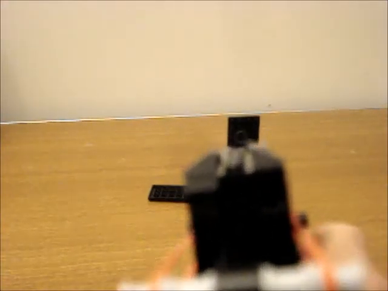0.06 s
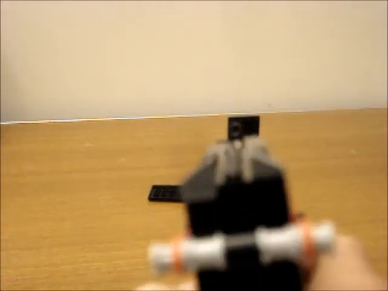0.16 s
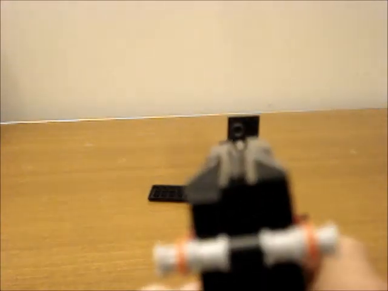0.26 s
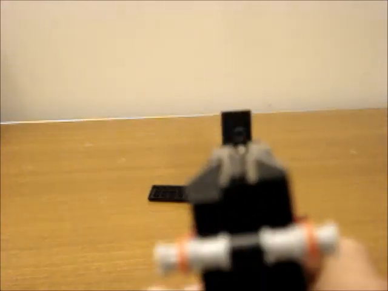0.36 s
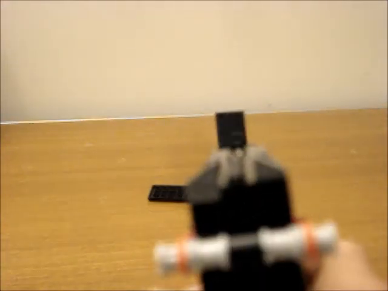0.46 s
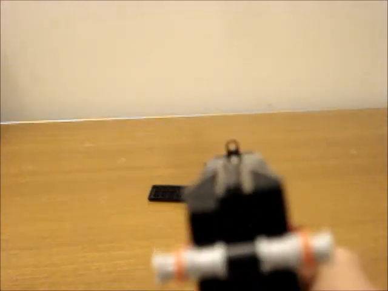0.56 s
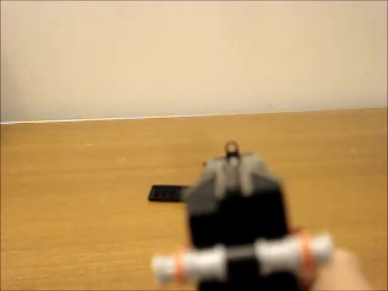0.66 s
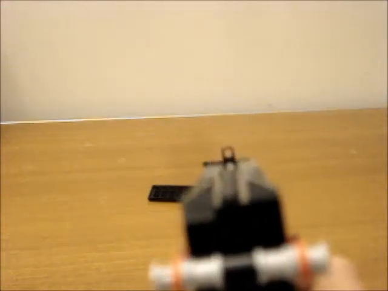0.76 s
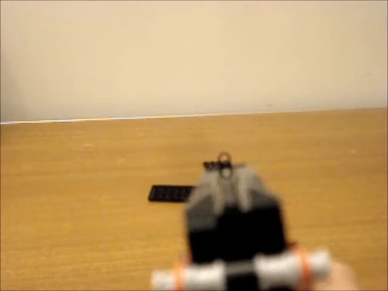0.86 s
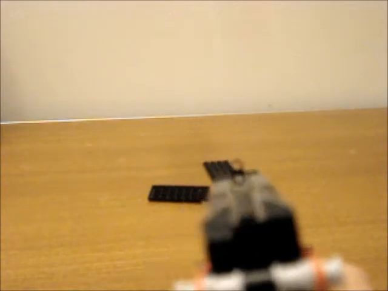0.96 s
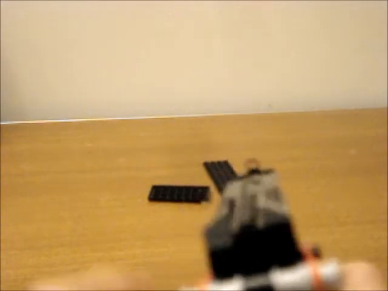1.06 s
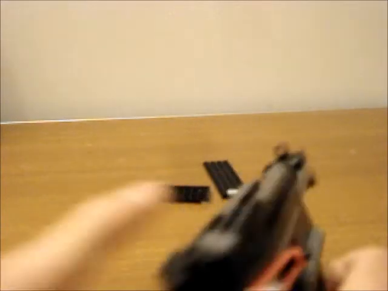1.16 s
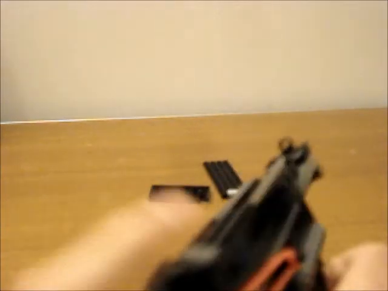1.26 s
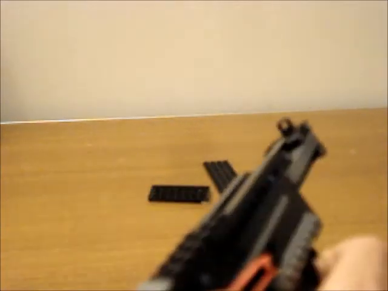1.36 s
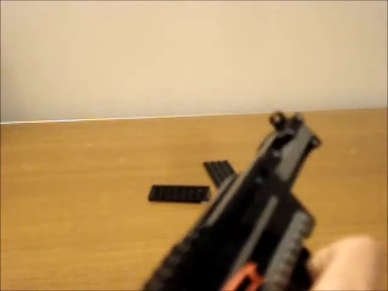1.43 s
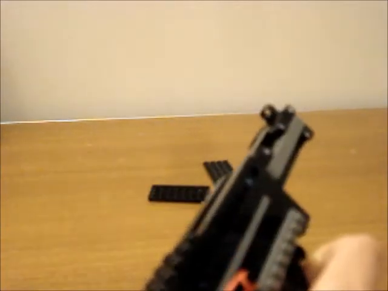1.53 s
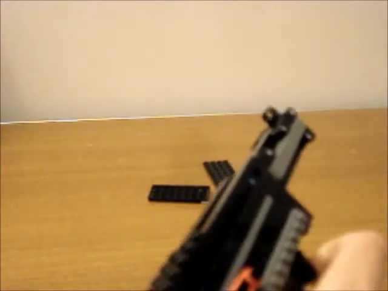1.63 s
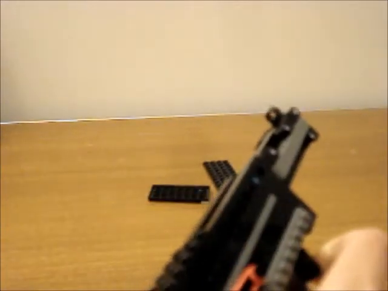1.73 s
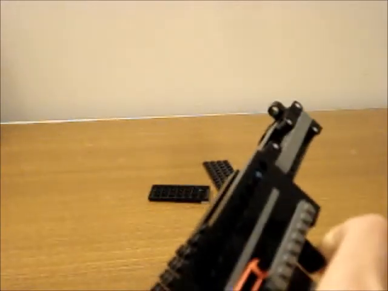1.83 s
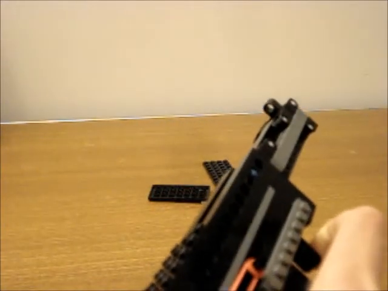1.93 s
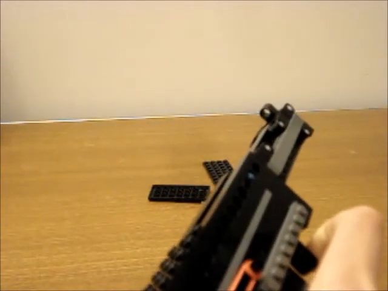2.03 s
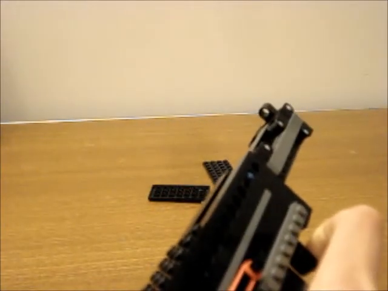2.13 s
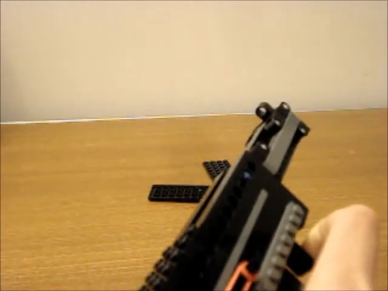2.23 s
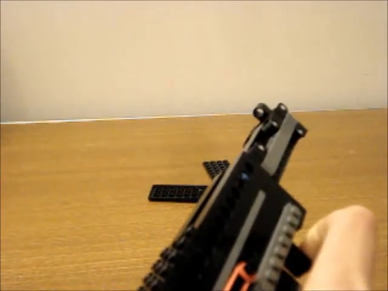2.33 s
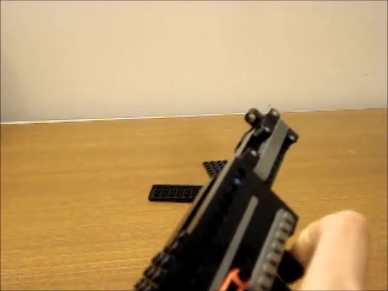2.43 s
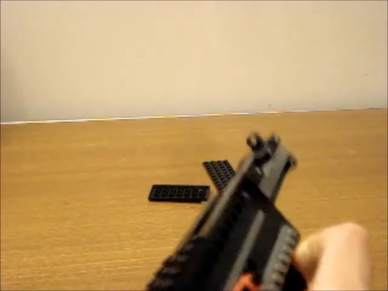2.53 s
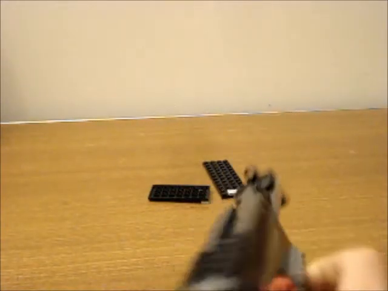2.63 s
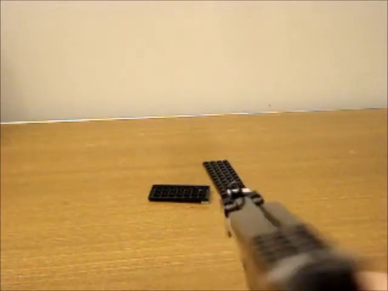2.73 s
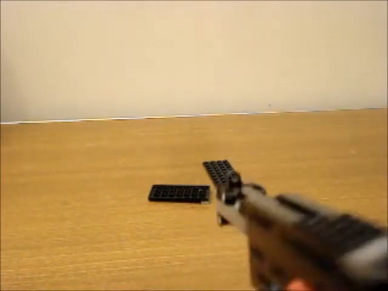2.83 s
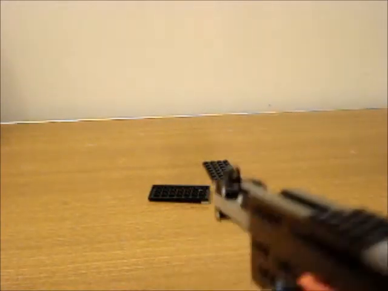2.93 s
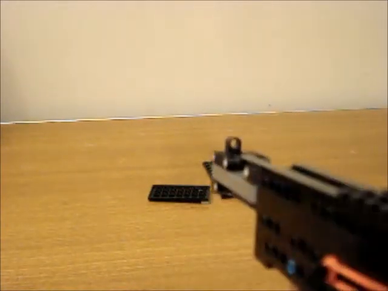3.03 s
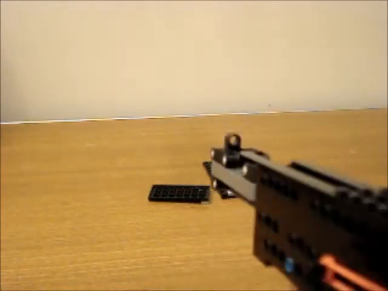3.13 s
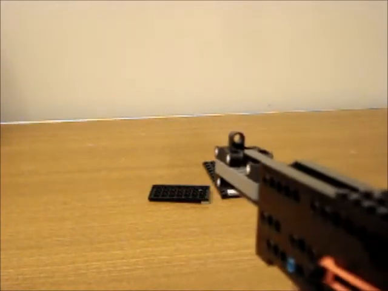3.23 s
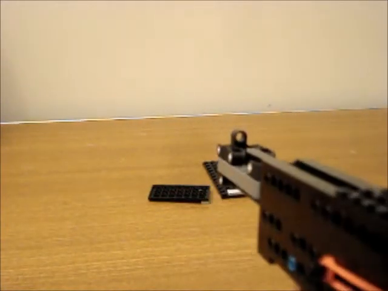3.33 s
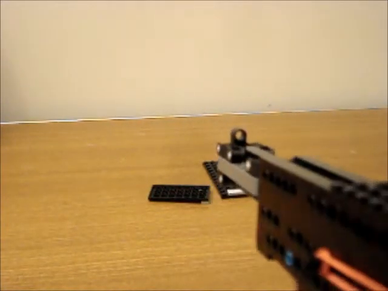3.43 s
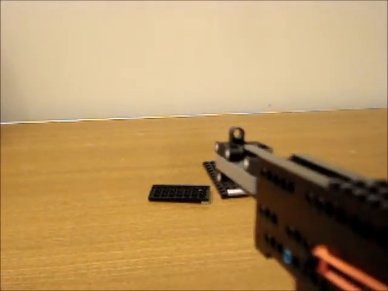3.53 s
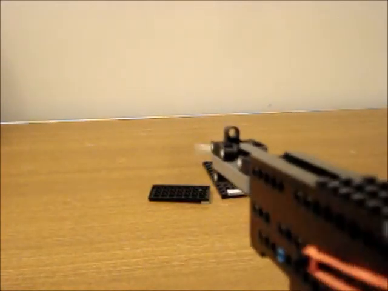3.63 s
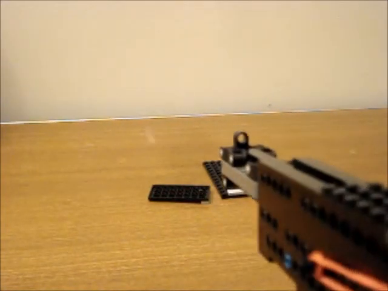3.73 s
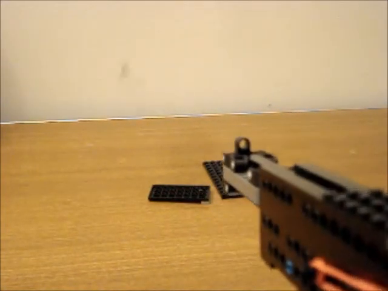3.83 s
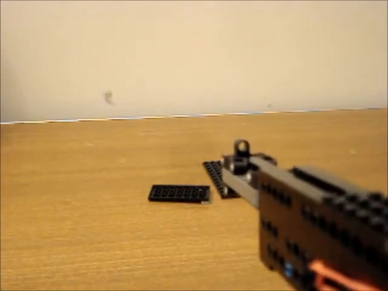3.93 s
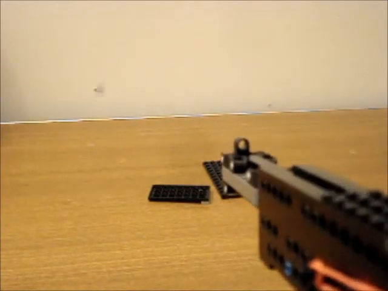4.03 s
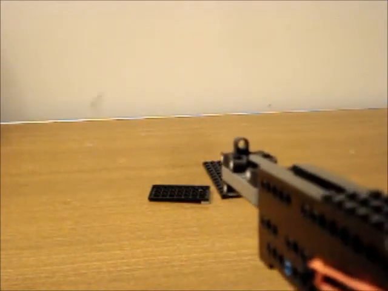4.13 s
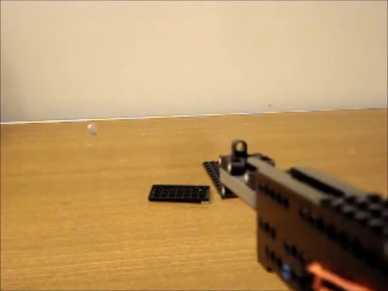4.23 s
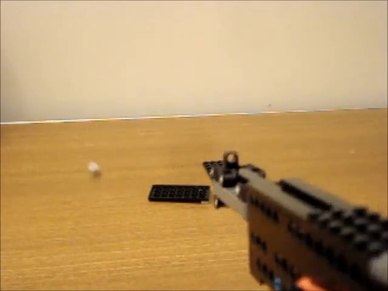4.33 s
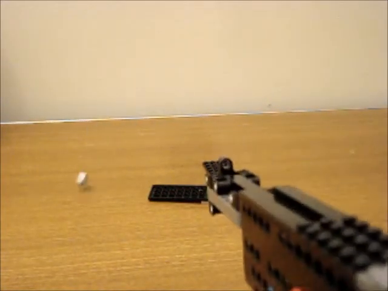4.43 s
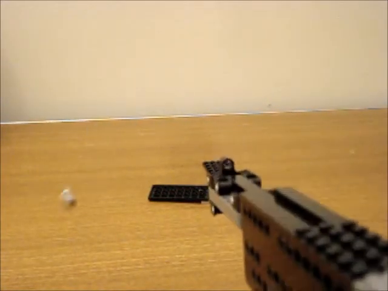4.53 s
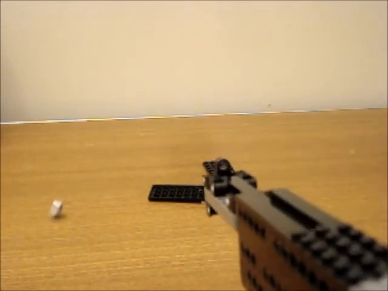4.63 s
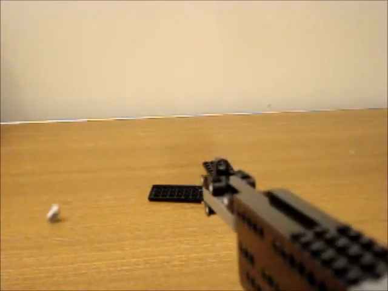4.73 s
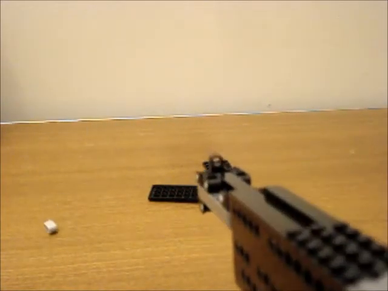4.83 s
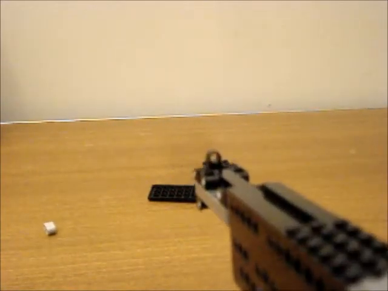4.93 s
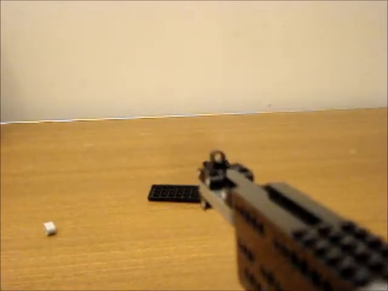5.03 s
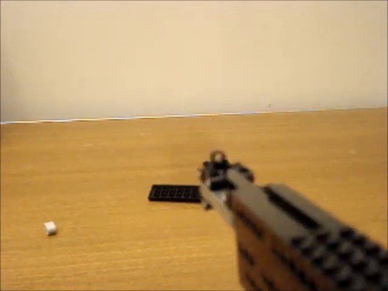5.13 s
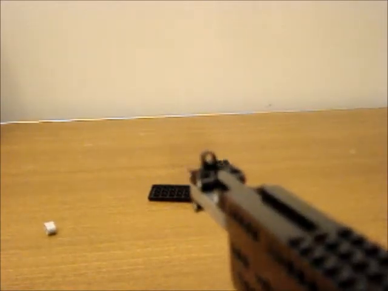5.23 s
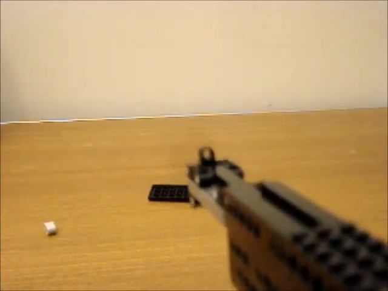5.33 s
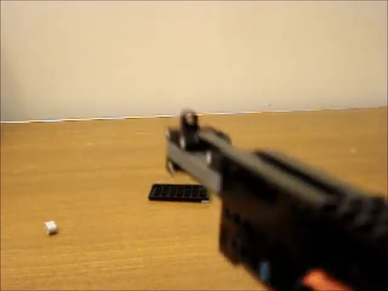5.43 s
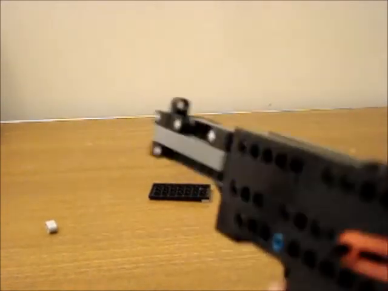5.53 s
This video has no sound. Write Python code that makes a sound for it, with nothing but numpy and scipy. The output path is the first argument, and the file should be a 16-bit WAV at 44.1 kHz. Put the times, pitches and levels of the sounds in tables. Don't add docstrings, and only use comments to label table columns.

```python
import sys
import numpy as np
from scipy import signal
from scipy.io import wavfile
from scipy.ndimage import uniform_filter1d

SR = 44100
rng = np.random.default_rng(int(sys.argv[2]) if len(sys.argv) > 2 else 0)


def gain_from_db(level_db):
    decades = np.asarray(level_db, float) / 20
    return 10 ** decades


def transcribe(u):
    v = np.clip(np.atleast_2d(u).T, -1, 1)
    q = np.round(v * 32767).astype(np.int16)
    wavfile.write(sys.argv[1], SR, q)


N = 246456

# f/Hz, level/dB
FAN_COLOUR = [(15, -41), (25, -5.5), (59, -26), (120, -11.5), (204, -12.5), (237, -6), (269, -12),
              (619, -6.5), (905, -8), (1110, -7.5), (1790, -9.5), (1980, -12), (2970, -18.5), (9020, -32.5),
              (10500, -34), (13600, -88), (22000, -120)]
# f/Hz, level/dB against the fan noise, width/Hz
FAN_TONES = [(328, -34, 11), (628, -15, 18), (685, -14, 6.7), (1950, -11.5, 67), (2570, -13.5, 190),
             (3970, -22.5, 170)]
# f/Hz, level/dB against the fan noise
MAINS_HUM = [(120, -26), (240.5, -11.5)]
# f/Hz, time to fall 60 dB/s
ROOM_DECAY = [(300, 0.29), (1000, 0.36), (2500, 0.27), (5000, 0.41), (10000, 0.2)]
# f/Hz, level/dB, time to fall 60 dB/s
THUD_TONES = [(243, -2, 0.13), (329, -1, 0.089), (390, -7, 0.085), (606, -7, 0.097)]

# f/Hz, level/dB per Hz
PISTOL_COLOUR = [(350, -53.5), (600, -30), (781, -24), (946, -13.5), (1130, -13), (1890, -4.5),
                 (2320, -7.5), (2590, -1.5), (4180, -6.5), (5430, -2.5), (9310, -15), (10100, -24),
                 (10500, -45), (13600, -77.5), (22000, -120)]
TABLE_COLOUR = [(120, -40), (200, -20), (466, -11), (597, -13.5), (846, -6), (1240, -3.5), (1440, -7.5),
                (2740, -3.5), (3460, -6.5), (9510, -11.5), (10500, -18.5), (13600, -61), (22000, -120)]
PLATE_COLOUR = [(120, -75.5), (200, -12), (450, -12.5), (700, -17.5), (1100, -13.5), (1500, 0.5),
                (1900, -9), (2500, -3.5), (3500, -13), (5400, -11.5), (7800, -16.5), (10500, -20),
                (13600, -66), (22000, -120)]
HOLLOW_COLOUR = [(300, -50), (700, -17), (1250, -7.5), (1700, -12), (2700, -3), (4300, -9), (7000, -18),
                 (22000, -110)]

# t/s, swell or first sinking/s, level at its end/dB, fade from there/(dB per s) Loose bricks in
RATTLES = [
    (0.153, 0.04, -23.5, 240),
    (2.09, 0.018, -25.5, 246),
    (2.477, 0.0075, -32.5, 246.5),
    (3.612, 0.037, -23.5, 298),
]
WOBBLES = [(0.303, 0.0046, -26.5, 179), (0.357, 0.00067, -20, 490), (0.494, .002, -35, 400),
           (0.79, 0.0052, -27.5, 458), (0.861, 0.0053, -42, 240), (0.934, .13, -31.5, 340),
           (3.773, 0.027, -25, 275), (3.968, .002, -36.5, 308), (4.37, .002, -32, 230),
           (4.472, 0.009, -31, 243), (4.558, 0.0096, -35.5, 50.6)]
SHUDDER = [
    (0.612, 0.0093, -21, 770),
    (0.655, 0.068, -41.5, 300),
]

# t/s, peak level/dB, ring f/Hz, tilt/(dB per octave)
HANDLING = [
    (1.3413, -31, 2040, -3.5),
    (1.5779, -25, 2140, -6),
    (1.621, -31.5, 3400, -4),
    (1.6827, -31, 1890, -4),
    (2.2505, -33.5, 3500, -2),
    (2.3366, -32, 1980, -8),
    (2.361, -33, 1860, -8),
    (5.2907, -39, 1900, -15),
    (5.3185, -34.5, 2870, -7),
]
TRIGGER_TICKS = [
    (2.6849, -38, 3740, 12),
    (3.1152, -34.5, 3050, 6.3),
    (5.3589, -34.5, 2620, 9.5),
]
PLATE_SLAPS = [
    (0.6092, -15, 1300, -3.5),
    (0.6166, -21, 2520, -9),
    (0.6245, -22.5, 1510, -8.5),
    (0.6367, -16.5, 1400, 2.8),
    (0.6465, -19, 1660, -11.3),
]
FIRST_BOUNCES = [(0.3022, -11.0, 5770, 2.5), (0.3099, -12.5, 2500, -0.4), (0.3256, -14, 4100, -0.5),
                 (0.3561, -20.5, 2180, -9.5), (0.4924, -17, 4620, -3), (0.5008, -22, 2820, 3),
                 (0.5109, -23, 1100, -4), (0.5824, -18.5, 3550, 1.5), (0.5907, -21.5, 1060, -8),
                 (0.7885, -18, 2920, 1), (0.7935, -19, 2800, -2.5), (0.8604, -24, 2120, -3),
                 (0.8717, -18.5, 4180, -2), (0.8799, -34.5, 2750, 12), (0.8963, -25, 4160, 5),
                 (0.9321, -24.5, 4200, 0.5), (0.9388, -25.5, 1320, -6), (0.981, -27, 4530, 3),
                 (1.0139, -29.5, 1610, 8), (1.0219, -29.5, 4180, 2)]
SECOND_BOUNCES = [(3.7723, -19.5, 1330, 4), (3.787, -27, 5200, -6), (3.7957, -27, 1330, 12),
                  (3.9669, -15.5, 1810, 1.5), (3.9835, -23.5, 4030, -1), (3.9915, -21.5, 5800, 2.5),
                  (4.2012, -17.5, 3190, 1), (4.2044, -15.5, 1260, 1.5), (4.2115, -24.5, 3150, -5),
                  (4.2295, -29, 1190, -3), (4.3665, -19.5, 1200, -2), (4.3724, -20, 1960, -1),
                  (4.4023, -22.5, 3120, 1), (4.4091, -35, 3120, -3), (4.4737, -22, 3320, 1.5),
                  (4.487, -25, 1340, -3), (4.4944, -25, 2850, -2), (4.5045, -29, 6370, 2),
                  (4.5573, -21, 2500, 3), (4.6051, -23.5, 1790, 0), (4.6394, -20, 1070, 2),
                  (4.6865, -28, 3500, -3.5), (4.7044, -28, 1250, 1), (4.7383, -31, 1090, -5),
                  (4.7791, -27.5, 3470, 3), (4.7865, -28.5, 3040, -2), (4.8289, -28.5, 3090, 0.5),
                  (4.8781, -31.5, 1490, -2.1)]
PLATE_KNOCKS = [
    (3.8925, -15.5, 2800, .2),
    (3.8973, -20, 2890, -1.1),
    (3.9037, -17.5, 2240, -1.3),
    (3.9085, -20, 2730, -1.6),
    (3.9209, -28, 2880, .2),
    (3.9251, -50, 2220, .2),
]
COCKING = [
    (2.0857, -19.5, 4200, 3),
    (2.0949, -16, 3890, 17),
    (2.0986, -20, 3350, -12),
    (2.1213, -14.5, 5850, 9),
    (2.1247, -19.5, 6500, -1.5),
]
LATCH = [
    (2.4765, -14.5, 2300, -0.6),
    (2.4787, -14.5, 2970, -1.5),
    (2.4859, -23, 3440, 1.5),
    (2.5027, -20, 2540, 1.5),
]
SHOTS = [(0.1525, -10, 3660, 3), (0.1616, -28, 5980, -10), (0.1762, -12, 5210, 10),
         (0.1811, -13.5, 1850, 17), (0.1967, -17, 4120, 14), (3.611, -9, 5610, 2.5),
         (3.6213, -12.5, 5260, 9), (3.6334, -14.5, 5500, 2), (3.6407, -10, 5800, 9.5),
         (3.6571, -38, 4670, 6), (3.6666, -15.5, 5320, 8)]

# t/s, jump (1 = full scale), settling time/s
ZERO_KICKS = [(.153, .04, .043), (.1648, -.62, .0001), (.1648, -.035, .005), (.184, -.012, .004),
              (.302, -.013, .006), (.6092, -.95, .00012), (2.096, .015, .025), (2.112, -.005, .01),
              (3.611, .025, .05), (3.6225, -.3, .0001), (3.6225, -.03, .005), (3.641, -.015, .005),
              (3.657, -.005, .004), (3.773, -.015, .005)]
# t/s (4 ms after the gap closes), lowest emptied f/Hz,
# length/s
EMPTIED = [(0.302, 2500, .008), (0.492, 3000, .016), (0.608, 4000, .015), (0.788, 2800, .026),
           (0.931, 7600, .026), (1.338, 5300, .03), (1.578, 2300, .02), (1.683, 5100, .018),
           (2.085, 3000, .023), (2.475, 1800, .02), (2.685, 6400, .012), (2.709, 6200, .016),
           (3.116, 6900, .01), (3.141, 6200, .017), (3.772, 6500, .016), (3.892, 4000, .03),
           (4.201, 2500, .016), (4.557, 5500, .012), (4.639, 8300, .02), (4.779, 7100, .017),
           (5.318, 6700, .016), (5.359, 5500, .03)]


def evened(x):
    return x / np.sqrt(np.mean(x ** 2) + 1e-20)


def read(points, hz):
    f, value = np.transpose(points)
    return np.interp(np.log(hz + 1), np.log(f + 1), value)


def add(mix, s, sound):
    part = mix[round(s * SR):][:len(sound)]
    part += sound[:len(part)]


def causal(gain_db, size=512):
    hz = abs(np.fft.fftfreq(2 * size, 1 / SR))
    log_gain = np.log(gain_from_db(np.maximum(gain_db(hz), -100)))
    spectrum = np.exp(np.conj(signal.hilbert(log_gain)))
    return np.fft.ifft(spectrum).real[:size]


def background(fan_db=-41.5, patchy_db=1.0):
    frames, hz = N // 256 + 5, np.fft.rfftfreq(1024, 1 / SR)
    a, b, patches = rng.standard_normal((frames, 513, 3)).T
    patches = uniform_filter1d(patches, size=10, axis=0)
    patches = evened(uniform_filter1d(patches, size=10, axis=1))
    z = (a + 1j * b) * gain_from_db(read(FAN_COLOUR, hz)[:, None] + patchy_db * patches)
    out = evened(signal.istft(z, nperseg=1024, noverlap=768)[1][:N])
    t = np.arange(N) / SR
    for tone_hz, db, width in FAN_TONES:
        r = np.exp(-np.pi * width / SR)
        noise = rng.standard_normal(N) + 1j * rng.standard_normal(N)
        wander = signal.lfilter([1], [1, -r], noise)
        out = out + gain_from_db(db) * evened((wander * np.exp(2j * np.pi * tone_hz * t)).real)
    for hum_hz, db in MAINS_HUM:
        out = out + gain_from_db(db + 3.5) * np.sin(2 * np.pi * hum_hz * t)
    return out * gain_from_db(fan_db)


def thud():
    out, t = np.zeros(N), np.arange(6000) / SR
    knock = np.zeros(len(t))
    for hz, db, t60 in THUD_TONES:
        knock += gain_from_db(db - 60 * t / t60) * np.sin(2 * np.pi * hz * t)
    soft_start = np.minimum(t / 0.003, 1)
    add(out, 3.007, gain_from_db(-32.5) * knock * soft_start)
    return out


def room(x, gap=0.002, count=3):
    out, at = np.zeros(N), np.arange(round(gap * SR), SR // 2 - 12, 12)
    for k in range(count):
        taps = np.zeros(SR // 2)
        sign = rng.choice([-1.0, 1.0], 2000)[:len(at)]
        late = rng.integers(0, 12, 2000)[:len(at)]
        taps[at + late] = sign
        hz, t, z = signal.stft(taps, SR, nperseg=128)
        fade = gain_from_db(-60 * t / read(ROOM_DECAY, hz)[:, None])
        tail = signal.istft(z * fade, SR, nperseg=128)[1]
        turn = np.sqrt(2 / count) * np.cos(2 * np.pi * (3.3 * np.arange(N) / SR + k / (2 * count)))
        out += signal.fftconvolve(x * turn, tail / np.linalg.norm(tail))[:N]
    return out


def rattle(rows, colour, per_s, spread_db, trim_db, swell_db):
    t, level = np.arange(N) / SR, np.zeros(N)
    for s, swell, db, fade_db in rows:
        late = t - s - swell
        rise = swell_db * np.maximum(late / swell, -1)
        level += (t >= s) * gain_from_db(db + np.where(late < 0, rise, -fade_db * late))
    size = rng.standard_normal(N) * gain_from_db(spread_db * rng.exponential(1, N).clip(0, 4))
    hits = (rng.random(N) < per_s / SR) * size
    ticks = signal.oaconvolve(hits, causal(lambda hz: read(colour, hz)))
    return gain_from_db(trim_db) * level * evened(ticks[:N])


def clicks(rows, colour, contact, ring_db, t60, bump_db, bass_db, room_db):
    direct, feed, t = np.zeros(N), np.zeros(N), np.arange(2048) / SR
    for s, db, ring_hz, tilt_db in rows:
        def shape(hz):
            tilt = tilt_db * np.log2(np.clip(hz, 1000, 11000) / 3000)
            bump = bump_db * np.exp(-(np.log((hz + 1) / ring_hz) / 0.19) ** 2)
            bass = bass_db / (1 + (hz / 1300) ** 4)
            return read(colour, hz) + tilt + bump + bass

        impulse = causal(shape)
        tick = 1.67 * np.exp(-t / 0.000044)
        snap = np.exp(-t / contact)
        chatter = 0.37 * np.exp(-t / 0.0039)
        grit = rng.standard_normal(len(t)) * (tick + snap + chatter)
        crack = np.convolve(grit, impulse)[:len(t)]
        crack = crack / abs(crack).max()
        ring = np.sin(2 * np.pi * ring_hz * t) * gain_from_db(ring_db - 60 * t / t60)
        add(direct, s, gain_from_db(db) * (crack + ring))
        energy = np.linalg.norm(crack) / np.linalg.norm(impulse)
        add(feed, s, gain_from_db(db + room_db) * impulse * energy)
    return np.array([direct, feed])


def slow_gain(x, knee_db=-32.5, share=1.26, memory=0.47, steep=1.577):
    r = np.exp(-1 / (memory * SR))
    load = (abs(uniform_filter1d(x ** 2, size=900)) / gain_from_db(2 * knee_db)) ** steep
    return (1 + signal.lfilter([1 - r], [1, -r], load)) ** (-share / 2)


def ducking(x, knee_db=-24.0, share=0.24, recover_db=84.5):
    power_db = 10 * np.log10(abs(uniform_filter1d(x ** 2, size=100)) + 1e-12)
    fall = np.arange(N) * recover_db / SR
    held_db = np.maximum.accumulate(power_db + fall) - fall
    return gain_from_db(-share * np.maximum(held_db - knee_db, 0))


def zero_line():
    out, t = np.zeros(N), np.arange(12000) / SR
    for s, jump, settle in ZERO_KICKS:
        add(out, s, jump * np.exp(-t / settle))
    return out


def lead_in(x, db=-12.5, spread=0.0015):
    t = np.arange(400) / SR
    smear = rng.standard_normal(len(t)) * np.exp(-t / spread)
    smear = smear[None] / np.linalg.norm(smear)
    backwards = signal.oaconvolve(x[:, ::-1], smear)[:, :N]
    return x + gain_from_db(db) * backwards[:, ::-1]


def dropouts(x, busy_db=-66.0, chance=0.26, calm=0.24, spared=0.1, from_hz=4200):
    hz, t, z = signal.stft(x, SR, nperseg=128, noverlap=96)
    keep = np.ones(z.shape[1:])
    draw = rng.random((len(t) // 12 + 1, 22))
    draw = draw.repeat(12, axis=0).repeat(3, axis=1)[:len(t), :len(hz)].T
    for s, low_hz, length in EMPTIED:
        end = s - 0.004
        keep[hz >= low_hz, round((end - length) * SR / 32):round(end * SR / 32)] = 0
    keep[draw > 1 - spared] = 1
    treble = uniform_filter1d((abs(z[0, hz > from_hz]) ** 2).mean(0), size=36)
    rate = chance * np.where(treble > gain_from_db(2 * busy_db), 1, calm)
    keep[draw < rate * (hz[:, None] - from_hz) / 5500] = 0.013
    return signal.istft(z * (keep + 0.019), SR, nperseg=128, noverlap=96)[1][..., :N]


def scene():
    pistol = dict(colour=PISTOL_COLOUR, contact=0.0023, ring_db=-6.0, t60=0.035, bump_db=-7.0)
    brick = dict(colour=TABLE_COLOUR, contact=0.0019, ring_db=-12, t60=0.04, bump_db=2.0)
    hollow = dict(colour=HOLLOW_COLOUR, contact=0.0039, ring_db=-6.5, t60=0.056, bump_db=1.0)
    plate = dict(colour=PLATE_COLOUR, contact=0.0021, ring_db=2.5, t60=0.013, bump_db=-0.5)

    hits = clicks(SHOTS, bass_db=-7.5, room_db=0.0, **pistol)
    hits += clicks(COCKING, bass_db=4.5, room_db=-5, **pistol)
    hits += clicks(LATCH, bass_db=0.5, room_db=-5, **pistol)
    hits += clicks(HANDLING, bass_db=-11.5, room_db=-2.0, **pistol)
    hits += clicks(TRIGGER_TICKS, bass_db=6.5, room_db=-16, **pistol)
    hits += clicks(PLATE_KNOCKS, bass_db=2.5, room_db=-2.5, **hollow)
    hits += clicks(FIRST_BOUNCES, bass_db=-1.0, room_db=-1.1, **brick)
    hits += clicks(SECOND_BOUNCES, bass_db=1.0, room_db=0.7, **brick)
    hits += clicks(PLATE_SLAPS, bass_db=-2.5, room_db=-0.5, **plate)
    direct, feed = hits

    shaking = rattle(RATTLES, PISTOL_COLOUR, per_s=3600, spread_db=2.0, trim_db=-3.0, swell_db=8.5)
    shaking += rattle(WOBBLES, TABLE_COLOUR, per_s=2500, spread_db=3.1, trim_db=-10.5, swell_db=-2.5)
    shaking += rattle(SHUDDER, PLATE_COLOUR, per_s=2700, spread_db=2.1, trim_db=-6.0, swell_db=-10.0)
    near = direct + shaking + room(feed + 0.51 * shaking)
    behind = background() * slow_gain(near) + thud()
    return (near + behind * ducking(near))[None]


def band_limit(x):
    return signal.sosfilt(signal.butter(12, 11120, fs=SR, output="sos"), x)


def record(dry):
    edge = signal.firwin(301, 10020, window=("kaiser", 9), fs=SR)
    x = lead_in(dry) + zero_line()
    x = signal.oaconvolve(x, edge[None], "same")
    return band_limit(dropouts(x))


dry = scene()
out = record(dry)
transcribe(out)
```